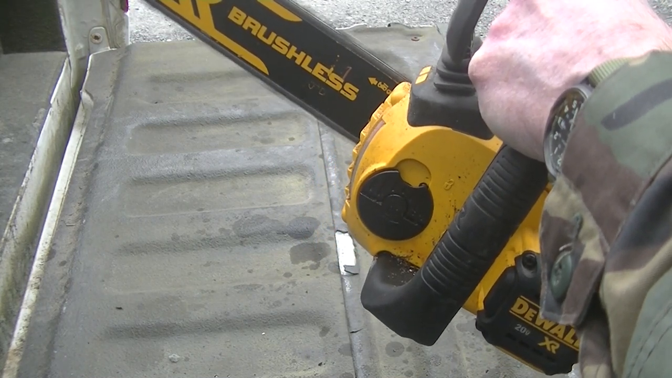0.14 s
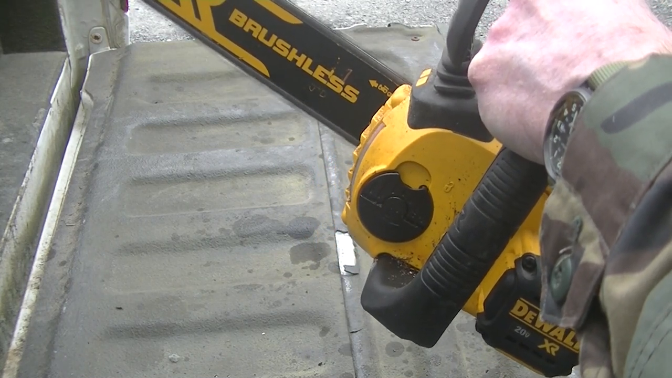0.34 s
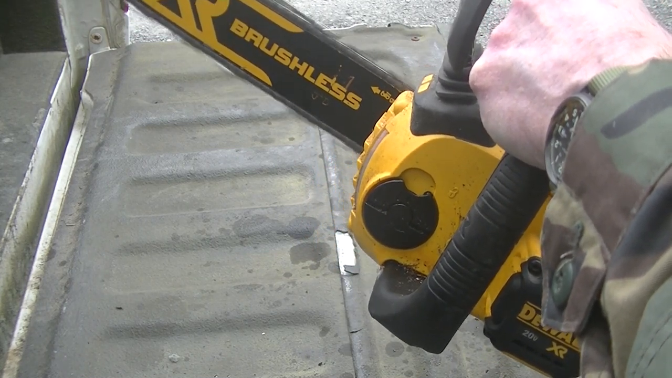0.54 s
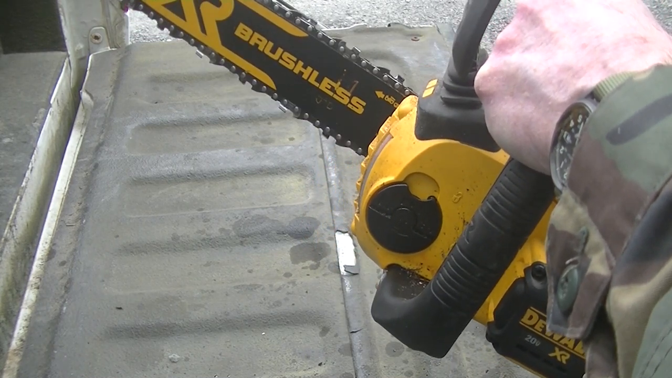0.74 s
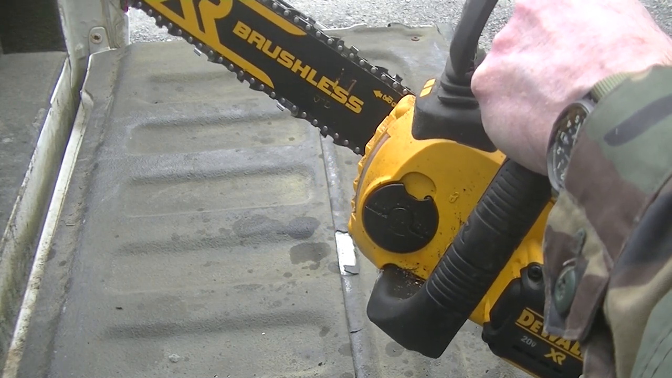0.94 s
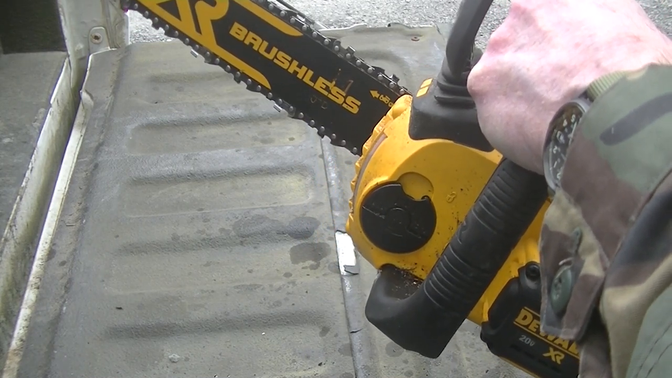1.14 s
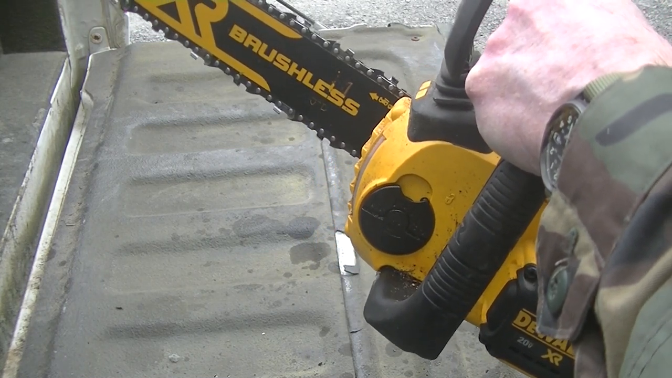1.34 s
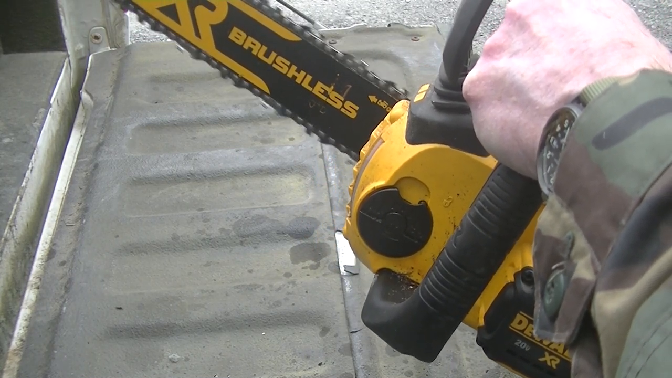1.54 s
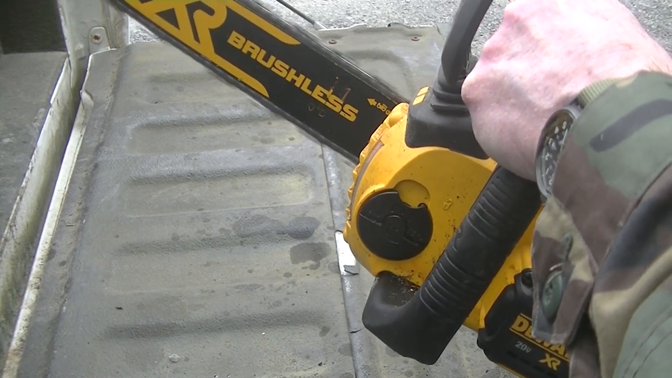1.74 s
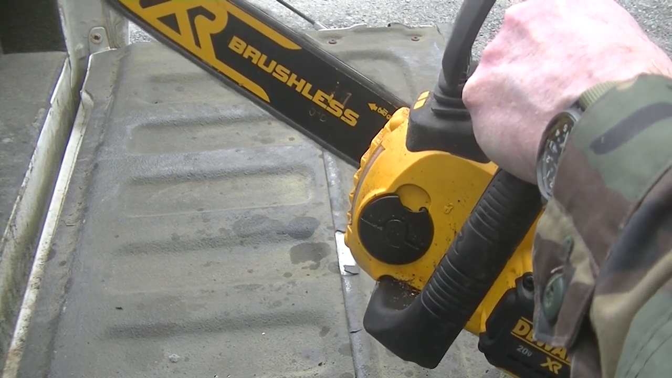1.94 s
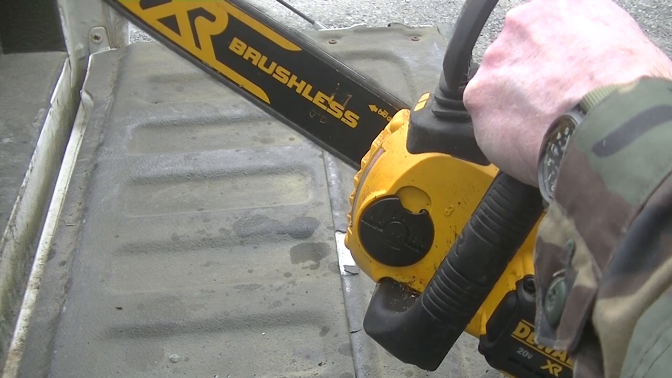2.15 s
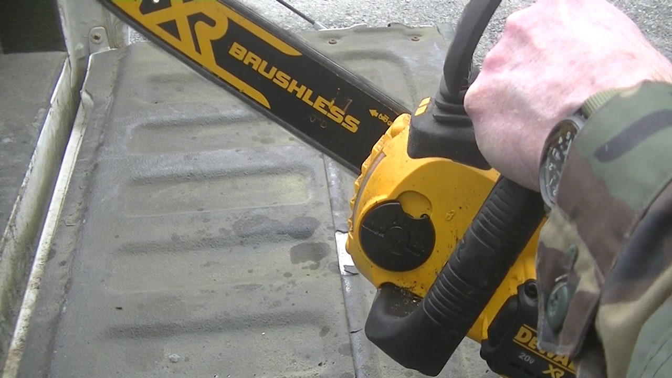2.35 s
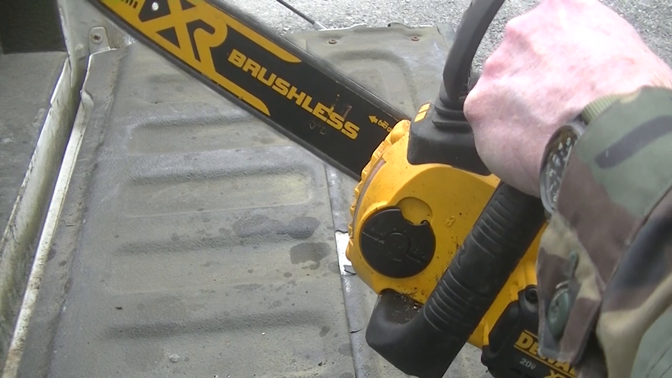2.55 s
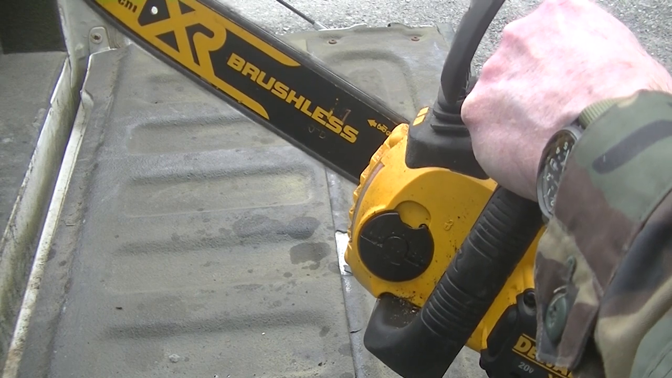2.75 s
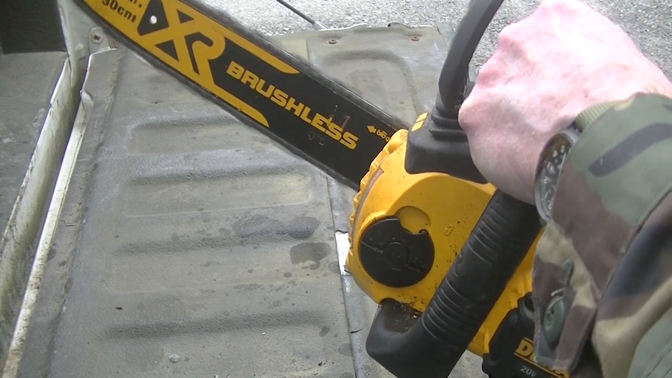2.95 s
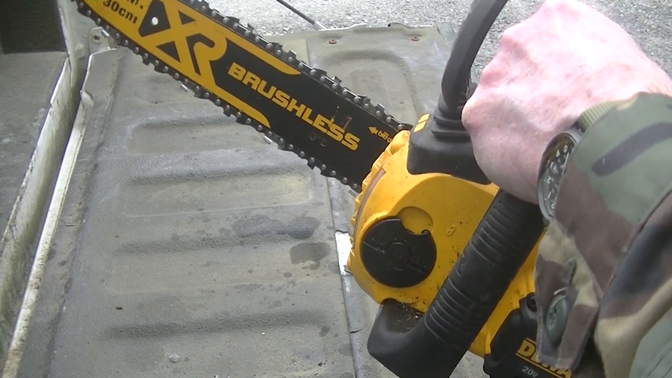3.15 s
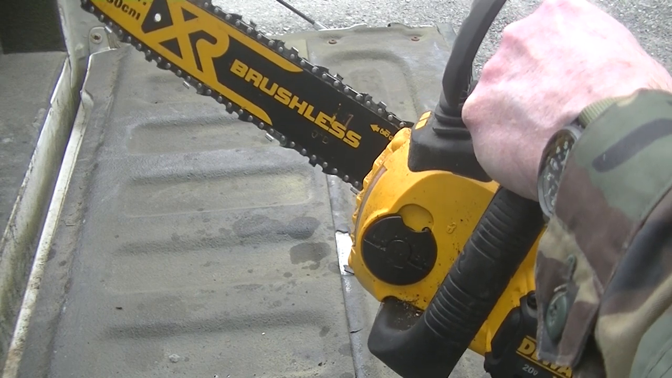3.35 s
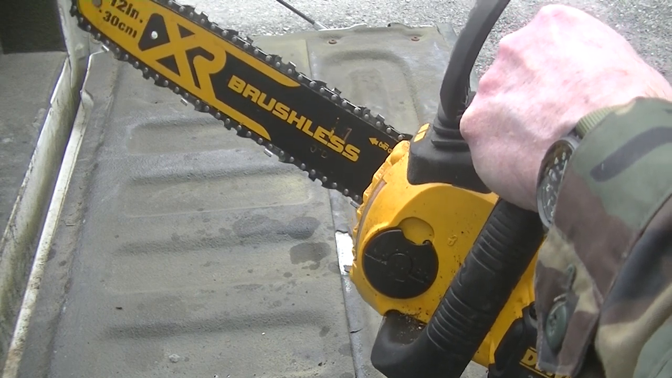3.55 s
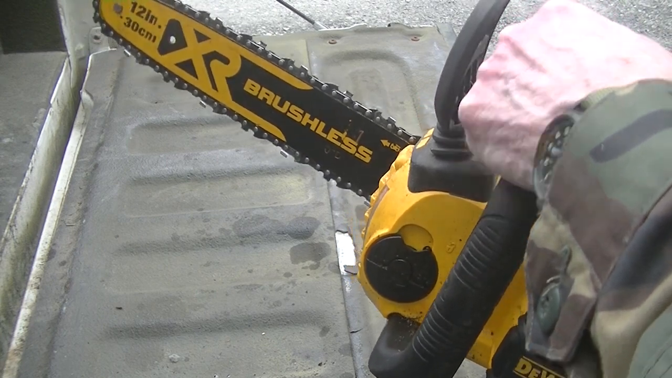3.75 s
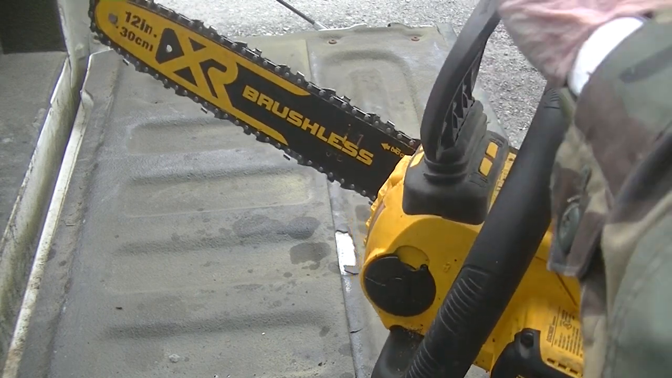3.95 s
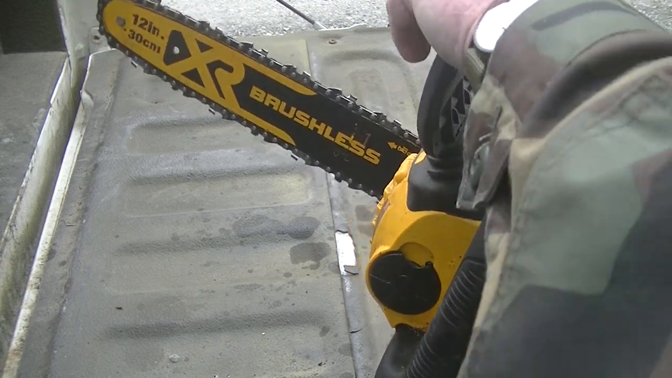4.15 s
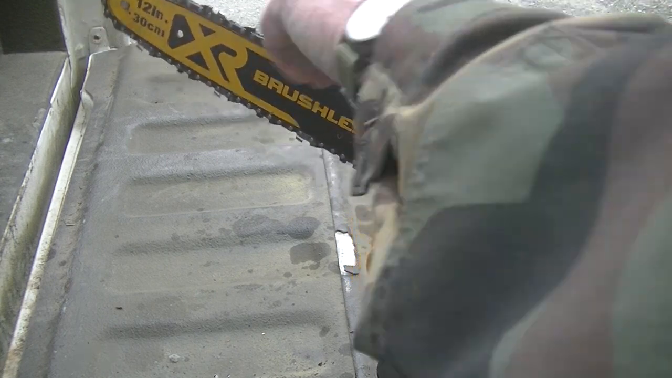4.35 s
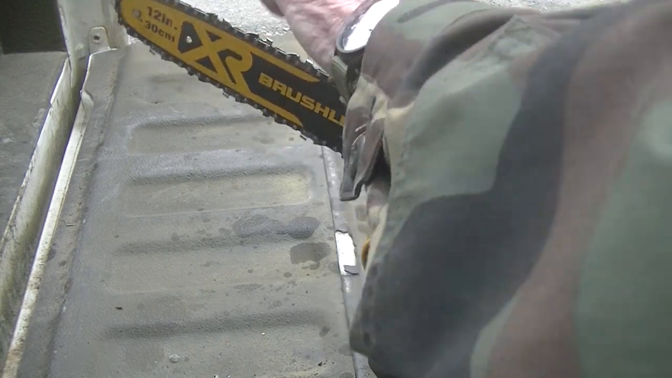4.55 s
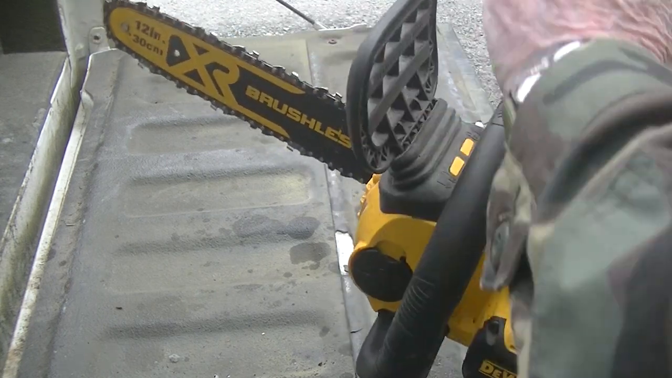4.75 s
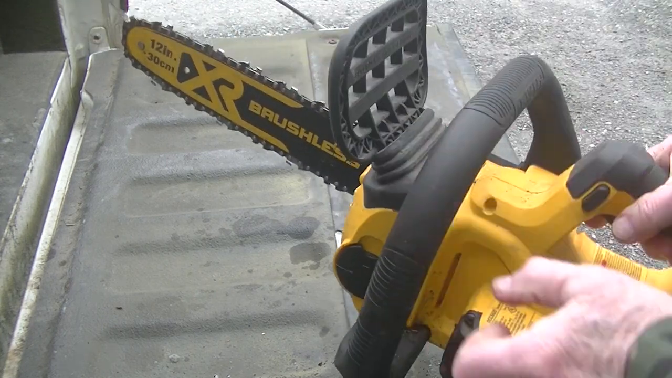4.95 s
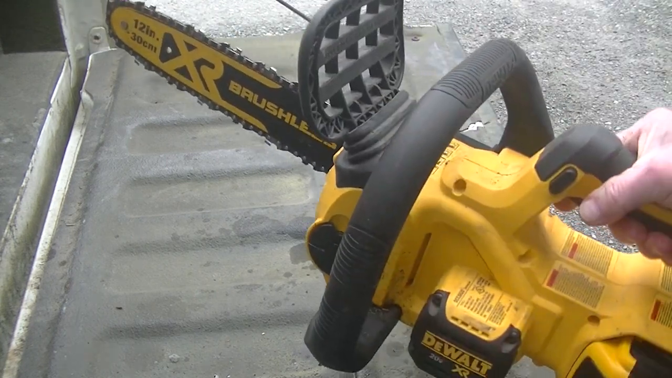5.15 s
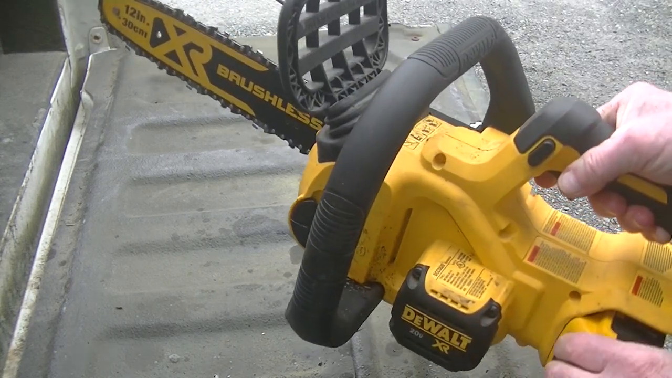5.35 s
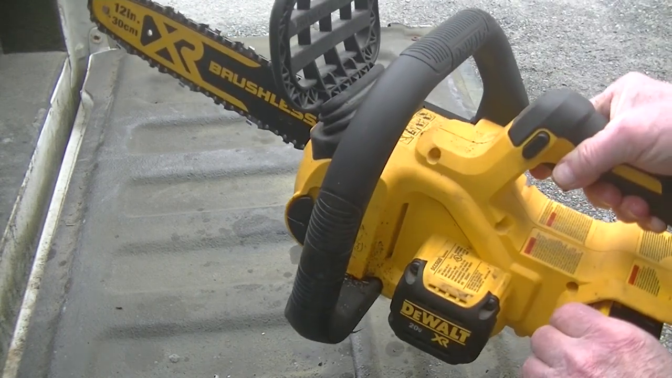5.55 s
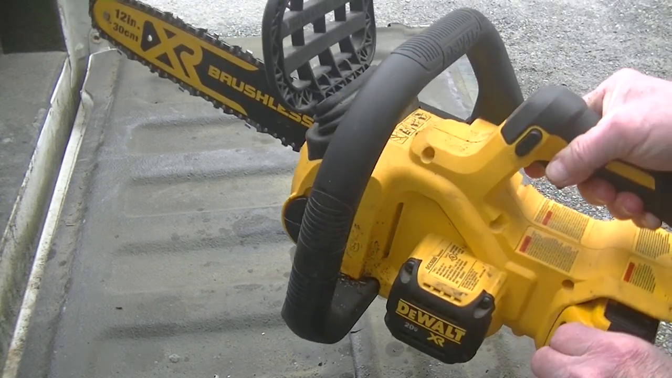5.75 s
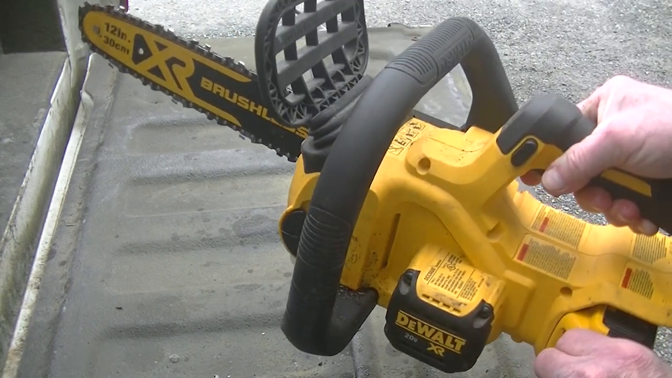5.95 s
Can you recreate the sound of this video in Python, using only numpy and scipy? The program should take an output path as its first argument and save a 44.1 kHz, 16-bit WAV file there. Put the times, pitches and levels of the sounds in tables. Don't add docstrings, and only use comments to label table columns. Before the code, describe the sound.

Close, dry outdoor stereo sound with a faint airy wash. From 0 s a battery chainsaw is at full speed: a piercing high whine near 4 kHz, metallic chain rattle and fizzy hiss. At 0.5 s it is released and pitch plunges, ending around 0.71 s in a sharp snap and brief metallic ring. A quiet gap follows, with soft sleeve rustle and barely audible bird whistles at 1.05 and 1.3 s. Small clicks at 1.45 s and a hard trigger click at 1.55 s launch the second run; it kicks, climbs unevenly to full speed by 2.3 s, holds, then drops from 2.93 s and halts at 3.1 s with a lighter click. Cloth rustles, strongest from 3.8 to 4.9 s. At 4.35 s the brake cracks loudly with a hollow knock. Faint handling clicks come near 5.2, 5.6 and 5.95 s over gentle fabric rubbing.

```python
import sys
import numpy as np
from scipy import signal
from scipy.io import wavfile
from scipy.ndimage import uniform_filter1d

SR = 44100
rng = np.random.default_rng(int(sys.argv[2]) if len(sys.argv) > 2 else 0)


def gain_from_db(level_db):
    decades = np.asarray(level_db, float) / 20
    return 10 ** decades


def to_wav(sig):
    pcm = np.clip(np.atleast_2d(sig), -1, 1) * 32767
    pcm = np.round(pcm).astype(np.int16)
    wavfile.write(sys.argv[1], SR, pcm.T)


N = 268569
T = np.arange(N) / SR
GEAR_TEETH, SPROCKET_TEETH = 73, 6


def evened(x):
    return x / np.sqrt(np.mean(x ** 2) + 1e-20)


def read(points, hz):
    f, value = np.transpose(points)
    return np.interp(np.log(hz + 1), np.log(f + 1), value)


def band(x, lo_hz, hi_hz, order=2):
    return signal.sosfilt(signal.butter(order, [lo_hz, min(hi_hz, .49 * SR)], "band", fs=SR, output="sos"), x)


def coloured(x, db_of):
    hz = abs(np.fft.fftfreq(8192, 1 / SR))
    log_gain = np.log(gain_from_db(np.maximum(db_of(hz), -100)))
    taps = np.fft.ifft(np.exp(np.conj(signal.hilbert(log_gain)))).real[:4096]
    return signal.oaconvolve(x, taps)[:len(x)]


def ring(x, hz, t60):
    r = np.exp(-np.log(1000) / (t60 * SR))
    return 2 * signal.lfilter([1 - r], [1, -r * np.exp(2j * np.pi * hz / SR)], x).real


def drift(span_s):
    size = max(round(span_s * SR), 1)
    return evened(uniform_filter1d(uniform_filter1d(rng.standard_normal(N), size), size))


def grains(per_s, spread_db):
    size = gain_from_db(spread_db * np.minimum(rng.exponential(1, N), 4)) * rng.choice([-1, 1], N)
    return evened(size * (rng.random(N) < per_s / SR))


# frequency in Hz, width in Hz, height in dB.
RINGS = [(448, 26, 8), (900, 20, 7.5), (1582, 160, 7), (1950, 83, 8), (2240, 140, 2.5), (2600, 18, 7),
         (3080, 28, 7), (3835, 280, 10), (4564, 130, 6), (5990, 32, 6.5), (10090, 830, 6)]


def humps_db(hz):
    return sum(db / (1 + (2 * (hz - f) / w) ** 2) for f, w, db in RINGS)


# frequency in Hz, density in dB per Hz.
BODY = [(24, -60), (40, -39.5), (262, -40), (354, -32.5), (630, -26.5), (697, -27), (896, -17), (1240, -15),
        (1950, -0.5), (3300, -5.5), (4460, -5), (5440, -6.5), (7930, -13), (10200, -13), (16000, -14.5)]


def body_db(hz):
    return read(BODY, hz) + humps_db(hz)


# trigger pulled in s, let go in s, full gear mesh in Hz, braking time in s.
RUNS = [
    (-1.0, .53, 4286, .183),
    (1.546, 2.93, 4310, .186),
]
# time after the trigger in s, share of full speed.
RUN_UP = [(0, .035), (.04, .143), (.064, .18), (.126, .371), (.154, .426), (.264, .535), (.648, .974),
          (.722, 1), (1.05, 1.0)]


def motion():
    mesh_hz, lost_hz, held_s, run = np.zeros((4, N))
    for k, (pulled, freed, full_hz, brake_s) in enumerate(RUNS):
        on = (T >= pulled) & (T < freed + brake_s)
        lost = full_hz * np.clip((T - freed) / brake_s, 0, 1)
        speed = full_hz * np.interp(T - pulled, *np.transpose(RUN_UP))
        held = np.clip(T - pulled - RUN_UP[-3][0], 0, .8)
        mesh_hz[on] = (speed - lost)[on]
        lost_hz[on], held_s[on], run[on] = lost[on], held[on], k
    return mesh_hz, lost_hz, held_s, run.astype(int)


# gear mesh in Hz, whine level in dB.
GEAR_CASE = [(150, -50), (1160, -34), (1700, -27), (2050, -32), (2300, -19), (2560, -38), (2980, -22),
             (3480, -39), (4250, -26)]
# gear mesh in Hz, level in dB.
UPPER = [(520, -40), (760, -21), (1750, -21), (2050, -36), (2500, -42)]
# one run's change of whine, rattle and hiss in dB.
WARM_DB = [(-1, .5, .8), (2.0, 0, 0)]
# rattle, hiss and knock slopes in dB per octave of speed.
SLACK_DB_PER_OCTAVE = [2.5, 2.5, 1.5]
UNLOAD_DB = np.array([-5.5, 0])
COAST_DB, COAST_HZ = -24.5, 1800
UPPER_BRAKED_DB = -18.5
LOAD_DB, LOAD_DB_PER_OCTAVE, SETTLE_DB_PER_S = 4, -1.5, -5
RATTLE_DB, HISS_DB, KNOCK_DB, HISS_DB_PER_OCTAVE = -17.5, -23.5, -35.5, 3.5
HALT_HZ, HALT_DB = 800, -25


def efforts(mesh_hz, lost_hz, held_s, run):
    octaves = np.log2(np.clip(mesh_hz / RUNS[0][2], 1e-3, 1))
    braking = lost_hz > 0
    halt_db = HALT_DB * braking * np.clip(1 - mesh_hz / HALT_HZ, 0, 1) ** 2 - 120 * (mesh_hz <= 0)
    whine_run, rattle_run, hiss_run = np.transpose(WARM_DB)[:, run]
    coast_db = COAST_DB * np.clip(lost_hz / 250, 0, 1) * np.clip(1.1 - lost_hz / COAST_HZ, .5, 1)
    whine_db = read(GEAR_CASE, mesh_hz) + whine_run * (held_s > 0) + coast_db + halt_db
    upper_db = read(UPPER, mesh_hz) + UPPER_BRAKED_DB * braking + halt_db - whine_db
    unload_db = (5.0 * octaves + np.array(UNLOAD_DB)[run]) * braking
    load_db = LOAD_DB + LOAD_DB_PER_OCTAVE * octaves + SETTLE_DB_PER_S * held_s * run + unload_db + halt_db
    rattle, hiss, knock = (slack * octaves * braking + halt_db for slack in SLACK_DB_PER_OCTAVE)
    rattle_db = RATTLE_DB + rattle_run + rattle
    hiss_db = HISS_DB + hiss_run + HISS_DB_PER_OCTAVE * octaves + hiss
    knock_db = KNOCK_DB + knock + 1.7 * drift(0.0084)
    return whine_db, upper_db, load_db, rattle_db, hiss_db, knock_db


# multiple of the gear mesh rate, level in dB.
MESH = [(2, 0), (3, -3), (4, -11)]


def gear_whine(turns, mesh_hz, whine_db, upper_db):
    phase = 2 * np.pi * GEAR_TEETH * turns
    whine = np.cos(phase)
    for k, db in MESH:
        above = np.log2(np.maximum(k * mesh_hz / 2800, 1))
        whine += gain_from_db(db + upper_db - 6 * above + 3 * drift(.007)) * np.cos(k * phase)
    unsteady_db = np.clip(6.5 - mesh_hz / 900, 2, 3.5)
    whine *= gain_from_db(whine_db + unsteady_db * drift(.008))
    return coloured(whine, lambda hz: 0.89 * body_db(hz) + 5.0)


# multiple of the sprocket tooth rate, level in dB.
TOOTH = [(1, -6), (5 / 3, -6), (2, -1), (13 / 6, -10), (3, 3), (4, -5), (5, -13), (6, -13)]
# frequency in Hz, gain in dB.
COVER = [(150, -85), (300, -63), (355, -54), (430, -50), (590, -55), (710, -53), (800, -53), (870, -42),
         (990, -43), (1060, -56), (1250, -52), (1415, -37), (1800, -28), (2200, -28)]


def tooth_tones(teeth, mesh_hz, load_db):
    tooth_hz = mesh_hz * SPROCKET_TEETH / GEAR_TEETH
    slow = np.log2(np.clip(mesh_hz / 2900, .05, 1))
    tones = np.zeros(N)
    for k, db in TOOTH:
        speed_db = 24.0 * slow * min(abs(k - 2), 1)
        level_db = db + speed_db + read(COVER, k * tooth_hz) + 1.8 * drift(0.037)
        tones += gain_from_db(level_db) * np.cos(2 * np.pi * k * teeth)
    return gain_from_db(load_db + 3) * tones


def chain_noise(turns, teeth, mesh_hz, rattle_db, hiss_db, knock_db):
    worn = grains(9000, 3)[:1024].reshape(2, 512)
    one, other = (np.interp(turns % 1 * 512, np.arange(512), w, period=512) for w in worn)
    meeting = 1.2 * drift(.07)
    repeat = np.cos(meeting) * one + np.sin(meeting) * other
    seated = 0.59 + 0.57 * np.exp(-(teeth % 1) / 0.11)
    loose = seated * (rng.standard_normal(N) + 0.46 * grains(1500, 3.0))
    burst_db = 1.1 + np.clip(1 - mesh_hz / 4300, 0, 1)
    loose *= gain_from_db(burst_db * drift(.008) + .6 * drift(.04))
    drive = coloured(evened(loose) + 0.72 * band(repeat, 1100, 15000), body_db)
    running = rattle_db > -40
    chain = np.zeros(N)
    for lo_hz, hi_hz, db in [(1100, 6430, rattle_db), (5620, 23000, hiss_db), (30.24, 934, knock_db + 0.5)]:
        part = band(drive, lo_hz, hi_hz, order=3)
        chain += gain_from_db(db) * part / part[running].std()
    return chain


# frequency in Hz, level in dB, 60 dB decay time in s.
BED = [(706, 2, .9), (1700, -12, .5), (4840, 0, .2), (4600, -6, .2)]


def saw():
    mesh_hz, *state = motion()
    whine_db, upper_db, load_db, *chain_db = efforts(mesh_hz, *state)
    turns = np.cumsum(mesh_hz * (1 + .0024 * drift(.012))) / SR / GEAR_TEETH
    teeth = SPROCKET_TEETH * turns
    direct = chain_noise(turns, teeth, mesh_hz, *chain_db)
    direct += gear_whine(turns, mesh_hz, whine_db, upper_db)
    direct += tooth_tones(teeth, mesh_hz, load_db)
    return direct + sum(gain_from_db(db) * ring(direct, hz, t60) for hz, db, t60 in BED)


# start in s, peak in dB, main ring in Hz, treble in dB, tail in dB.
CLICKS = [(.712, -10.5, 1676, -24, -11), (1.443, -43, 1700, -14, -4), (1.449, -20, 1950, 3, -6),
          (1.544, -28, 1690, -7, 1), (1.55, -5, 1800, -9.5, -20.5), (1.551, -15.5, 1950, -20.5, 19.5),
          (3.119, -27, 1800, -26, -10), (3.856, -40, 1294, -10, -11), (4.35, -10, 1975, -11.5, -20),
          (4.351, -1, 2350, -8, -15), (4.352, -7, 4300, -11, -9), (.713, -23.5, 4080, -8, -14),
          (5.19, -32.5, 2600, -3, -1), (5.264, -43, 2240, 0, -9), (5.594, -51.5, 3700, -24, -16),
          (5.948, -31, 1350, -17, 4), (5.99, -19.5, 1820, -26, -15)]
BASS_DB = -30


def clicks():
    out, t = np.zeros(N + SR), np.arange(SR // 2) / SR
    noises = rng.standard_normal((len(CLICKS), len(t)))
    for (s, db, hz, treble_db, tail_db), noise in zip(CLICKS, noises):
        t60 = 0.03 + 0.13 * gain_from_db(db / 2)
        fall = gain_from_db(-60 * t / 0.0082) + gain_from_db(tail_db - 60 * t / t60)
        blow = noise * fall * np.minimum(t / 0.00022, 1)
        casing = coloured(blow, lambda f: 0.63 * humps_db(f))
        mid = band(casing, 0.76 * hz, 1.68 * hz, order=3) + 0.63 * ring(blow, hz, 0.048)
        top = band(band(blow, min(1.9 * hz, 4200), 15000), 2000, 6500, order=1)
        low = band(blow, 270, 1100, order=3) + 1.7 * ring(blow, 380, .17)
        sound = sum(gain_from_db(g) * x / abs(x).max() for g, x in [(0, mid), (treble_db, top), (BASS_DB, low)])
        out[round(s * SR):][:len(t)] += gain_from_db(db + 1.5) * sound
    return out[:N]


# start in s, peak in dB, top in Hz, 60 dB decay time in s.
THUMPS = [
    (1.45, -39.5, 1100, 0.074),
    (3.855, -45, 1100, 0.064),
    (4.35, -21, 1100, 0.083),
    (5.153, -51, 340, .06),
    (5.19, -47, 1490, 0.035),
]


def thumps():
    out, t = np.zeros(N + SR), np.arange(SR // 2) / SR
    for (s, db, top_hz, t60), noise in zip(THUMPS, rng.standard_normal((len(THUMPS), len(t)))):
        blow = noise * gain_from_db(-60 * t / t60)
        low = band(blow, 270, top_hz, order=3) + 0.62 * ring(blow, 380, 0.51)
        out[round(s * SR):][:len(t)] += gain_from_db(db) * low / abs(low).max()
    return out[:N]


# start in s, frequency in Hz, level in dB, 60 dB decay time in s.
LOCKS = [
    (.713, 4840, -43, .2),
    (.713, 10400, -57, .16),
    (3.105, 4600, -46, .12),
    (5.594, 3700, -45, .035),
]


def lock_rings():
    out, t = np.zeros(N + SR), np.arange(SR // 2) / SR
    for s, hz, db, t60 in LOCKS:
        out[round(s * SR):][:len(t)] += gain_from_db(db - 60 * t / t60) * np.sin(2 * np.pi * hz * t)
    return out[:N]


# peak time in s, swell in s, fade in s, rustle in dB, crisp part against it in dB.
STROKES = [(1.09, 0.074, 0.19, -60.5, -18), (1.25, 0.15, .2, -59, -9), (3.3, .08, 0.27, -66.5, -18),
           (3.83, 0.054, 0.039, -51.5, 0), (3.853, .02, 0.012, -62, 8), (4.06, 0.077, 0.13, -51.5, -7),
           (4.1, 0.056, 0.028, -63, 8), (4.25, 0.069, 0.068, -55, -11), (4.345, 0.032, 0.17, -45.5, -12),
           (4.47, 0.12, 0.015, -51, -7), (4.55, 0.027, 0.16, -53.5, -20), (4.61, .01, 0.017, -65, 7),
           (4.86, 0.14, 0.028, -55.5, -11), (4.893, 0.011, 0.032, -60, 13), (5.0, 0.13, 0.13, -58, -5.5),
           (5.27, .01, 0.014, -64, 7), (5.38, 0.24, 0.25, -60.5, -6), (5.48, .015, .02, -72, 6),
           (5.67, 0.11, 0.094, -62, -4), (5.85, 0.14, .07, -62, -6), (5.97, 0.043, 0.072, -65, 4.5)]
# frequency in Hz, density in dB per Hz.
CLOTH = [(180, -53.5), (300, -18.5), (366, -4), (593, -11), (978, -7.5), (1060, -8.5), (3030, -2),
         (9550, -15), (16000, -28)]
STROKE_DROP_DB, DULL_DB = -8.5, -10


def sleeve():
    rustle, crisp = np.zeros((2, N))
    for s, swell_s, fade_s, db, crisp_db in STROKES:
        distance = (T - s) / np.where(T < s, swell_s, fade_s)
        power = gain_from_db(db + STROKE_DROP_DB * distance ** 2) ** 2
        rustle += power
        crisp += power * gain_from_db(crisp_db) ** 2
    levels = np.sqrt([rustle, crisp, rustle * gain_from_db(DULL_DB + 4.0 * drift(.02)) ** 2])
    scratch = rng.standard_normal(N) + .5 * grains(900, 1.7)
    rub = coloured(scratch * gain_from_db(1.6 * drift(0.023)), lambda hz: read(CLOTH, hz))
    edges = [(1300, 6000), (5000, 16000), (250, 1700)]
    return sum(level * evened(band(rub, *edge, order=1)) for level, edge in zip(levels, edges))


# start in s, length in s, start pitch in Hz, end pitch in Hz, level in dB.
CHIRPS = [
    (1.05, .05, 10200, 10600, -76),
    (1.308, 0.091, 10440, 10000, -73),
]


def bird():
    out = np.zeros(N)
    for s, length, start_hz, end_hz, db in CHIRPS:
        t = np.arange(round(length * SR)) / SR
        out[round(s * SR):][:len(t)] += gain_from_db(db) * np.hanning(len(t)) * signal.chirp(t, start_hz, length, end_hz)
    return out


# frequency in Hz, side to mid in dB.
WIDTH = [(60, 2.5), (130, -3), (290, -10), (640, -13.5), (1410, -21), (3100, -11.5), (6820, -3),
         (15000, -5)]
# frequency in Hz, left to right in dB.
LEAN = [(60, 0.0), (150, 0.23), (380, 1.0), (950, -0.64), (2380, -1.3), (5980, 0.16), (15000, 1)]


def surroundings(x):
    t = np.arange(SR // 2) / SR
    far = rng.standard_normal(len(t)) * gain_from_db(-60 * t / .5)
    x = x + gain_from_db(-22) * band(signal.oaconvolve(x, far / np.linalg.norm(far))[:N], 450, 5500)
    hz, _, z = signal.stft(x, SR, nperseg=256, noverlap=192)
    steps = 2.8 * rng.standard_normal(z.T.shape)
    wander = np.cumsum(steps, axis=0).T + rng.uniform(0, 2 * np.pi, (len(hz), 1))
    z = z * gain_from_db(read(WIDTH, hz) + 5.0)[:, None] * np.exp(1j * wander)
    side = signal.istft(z, SR, nperseg=256, noverlap=192)[1][:N]
    left = coloured(x, lambda hz: read(LEAN, hz) / 2) + side
    right = coloured(x, lambda hz: -read(LEAN, hz) / 2) - side
    return np.array([left, right])


# frequency in Hz, left-right likeness from 0 to 1.
AIR_SAME = [(60, 0.18), (180, 0.11), (550, 0.084), (1650, 0.16), (4970, 0.15), (15000, 0.13)]
# frequency in Hz, density in dB per Hz.
AIR = [(18, -64.5), (30, -32), (145, -19.5), (188, -5), (286, -9), (318, -4), (955, -8), (1030, -9),
       (2870, -3.5), (6480, -11), (7990, -18), (15800, -18.5)]
AIR_DB, HUM_HZ, HUM_DB = -58, 7880, -79


def air():
    hz = np.fft.rfftfreq(1024, 1 / SR)
    a, b, c, d, patches = rng.standard_normal((N // 256 + 5, 513, 5)).T
    patches = evened(uniform_filter1d(uniform_filter1d(patches, size=12, axis=0), size=14, axis=1))
    same = np.clip(read(AIR_SAME, hz), -1, 1)[:, None]
    left = a + 1j * b
    right = same * left + np.sqrt(1 - same ** 2) * (c + 1j * d)
    z = np.array([left, right]) * gain_from_db(read(AIR, hz)[:, None] + 2.2 * patches)
    wash = evened(signal.istft(z, nperseg=1024, noverlap=768)[1][:, :N])
    return gain_from_db(AIR_DB) * wash + gain_from_db(HUM_DB + 1.2 * drift(0.033)) * np.sin(2 * np.pi * HUM_HZ * T)


def scene():
    near = saw() + clicks() + thumps() + lock_rings() + sleeve() + bird()
    return surroundings(near) + air()


def low_pass(x):
    return signal.sosfilt(signal.butter(12, 16850, fs=SR, output="sos"), x)


def record(dry):
    edge = signal.firwin(511, 15930, window=("kaiser", 9), fs=SR)
    mix = signal.oaconvolve(np.clip(dry, -1, 1), edge[None], "same")
    return low_pass(mix)


dry = scene()
out = record(dry)
to_wav(out)
```